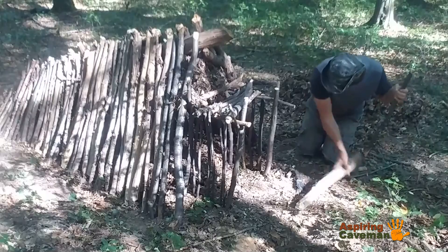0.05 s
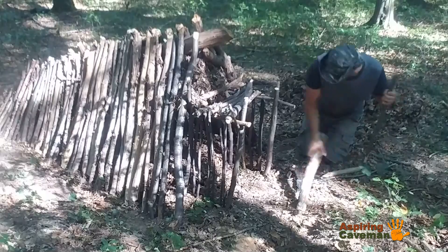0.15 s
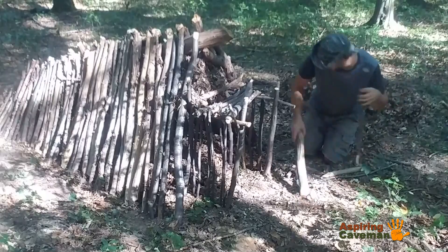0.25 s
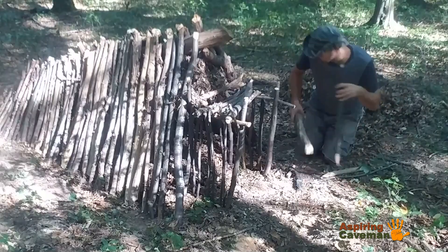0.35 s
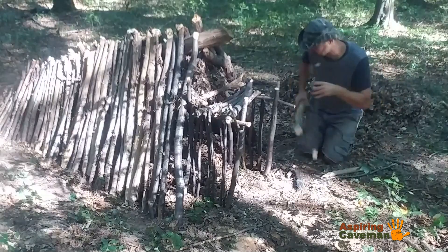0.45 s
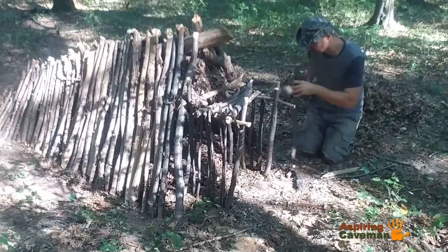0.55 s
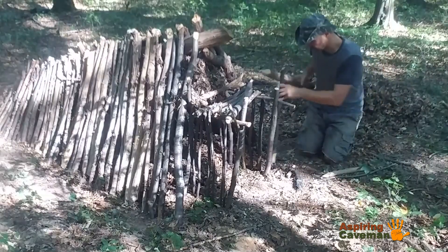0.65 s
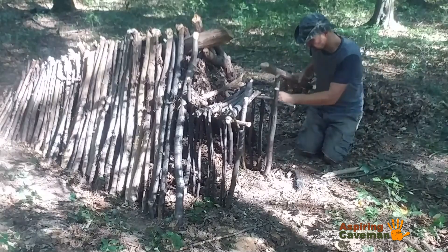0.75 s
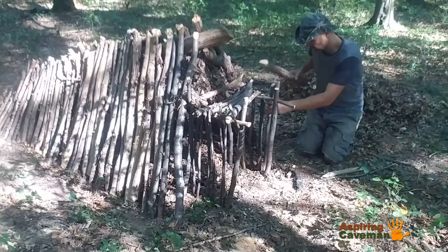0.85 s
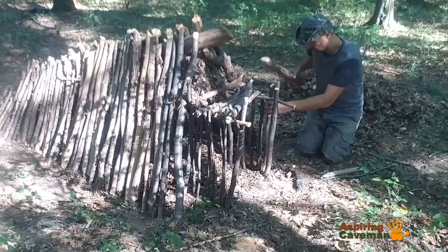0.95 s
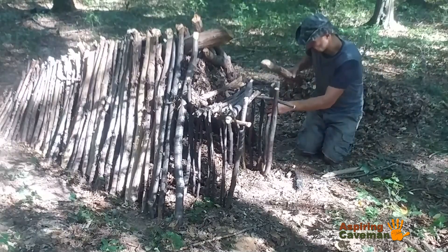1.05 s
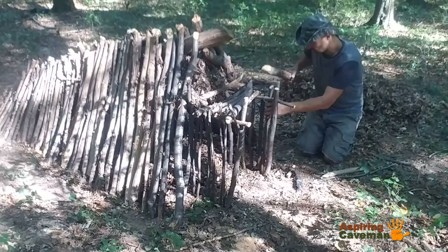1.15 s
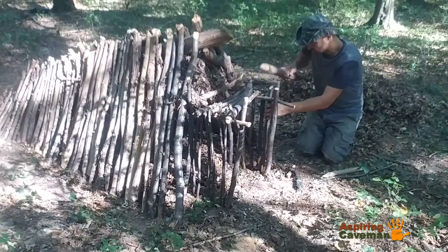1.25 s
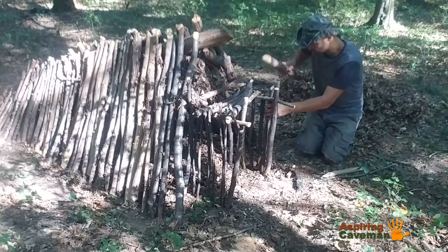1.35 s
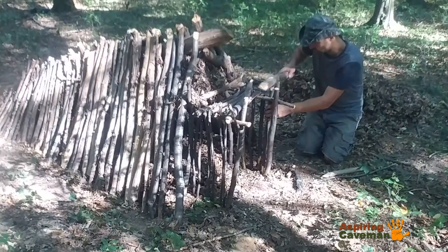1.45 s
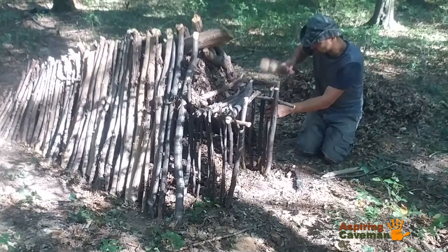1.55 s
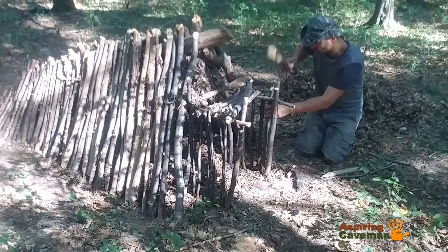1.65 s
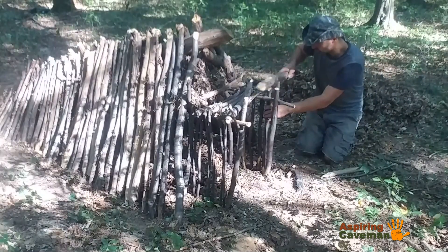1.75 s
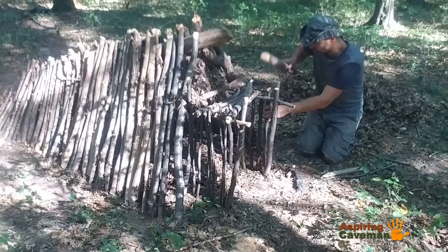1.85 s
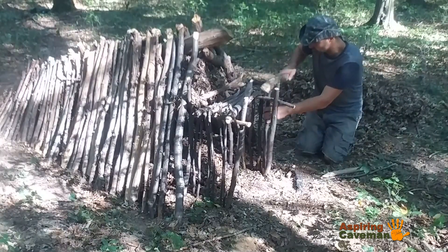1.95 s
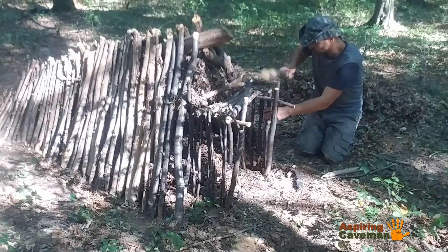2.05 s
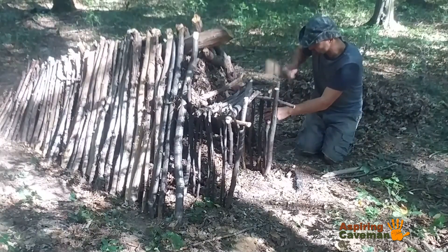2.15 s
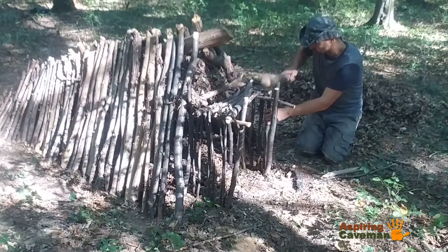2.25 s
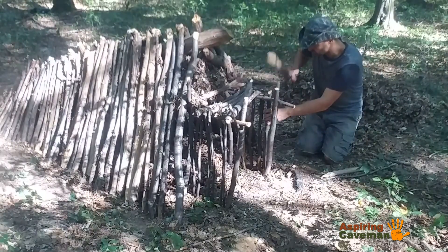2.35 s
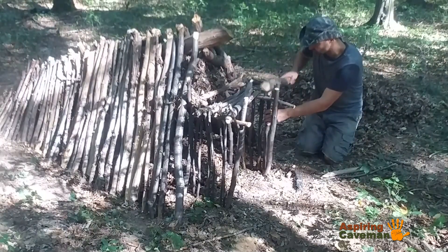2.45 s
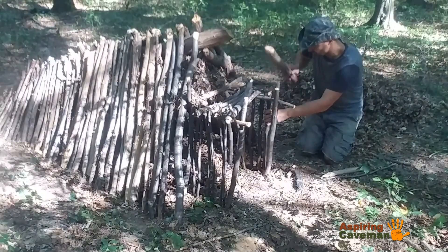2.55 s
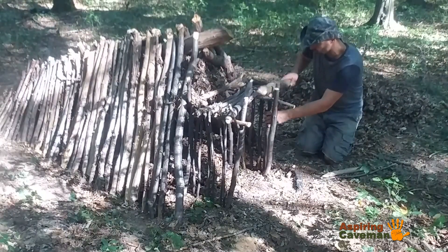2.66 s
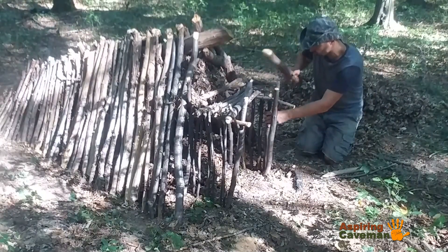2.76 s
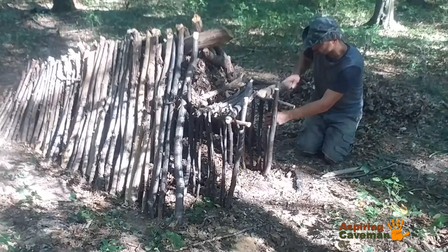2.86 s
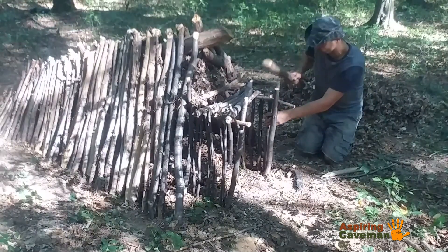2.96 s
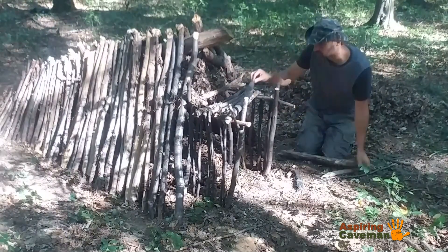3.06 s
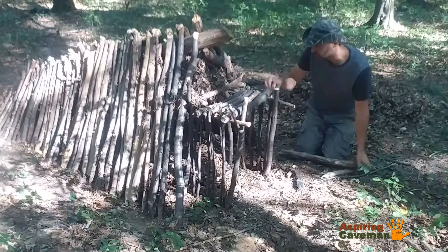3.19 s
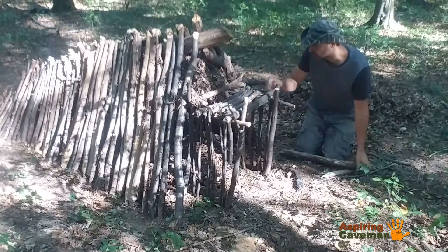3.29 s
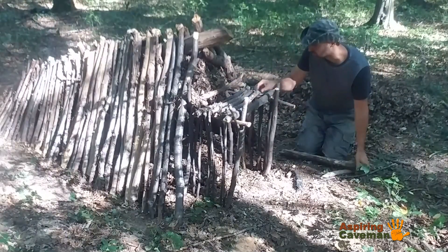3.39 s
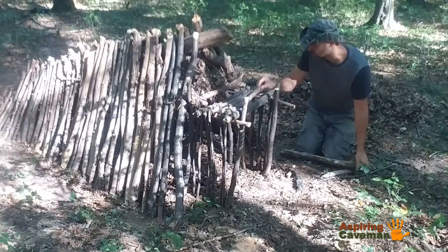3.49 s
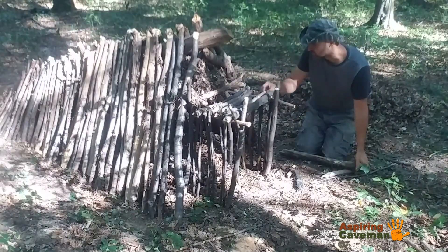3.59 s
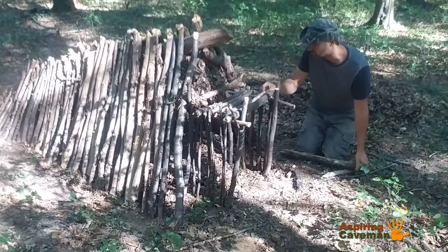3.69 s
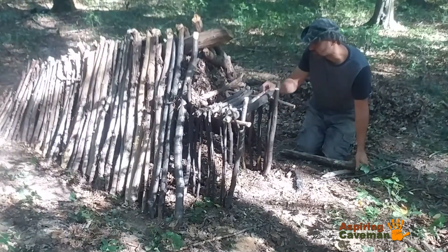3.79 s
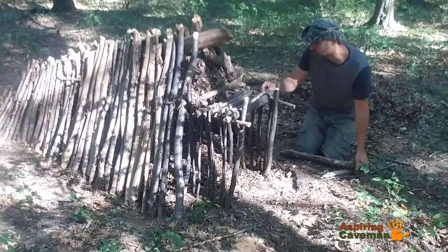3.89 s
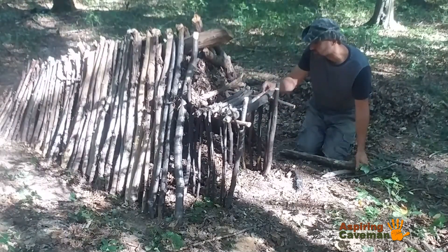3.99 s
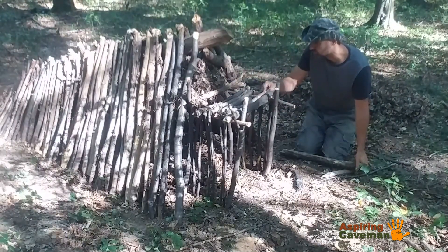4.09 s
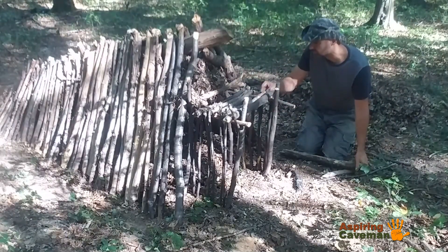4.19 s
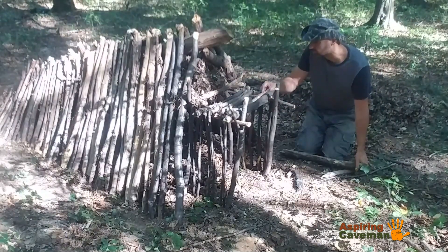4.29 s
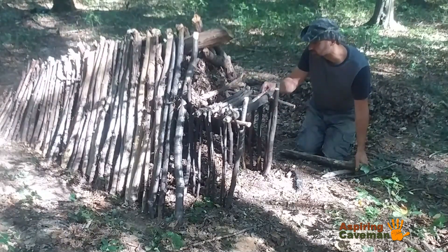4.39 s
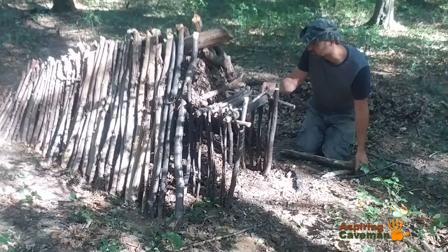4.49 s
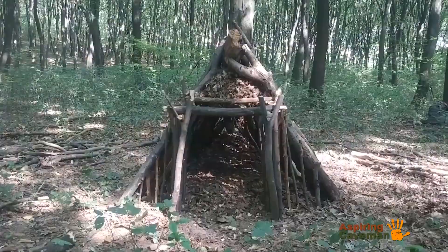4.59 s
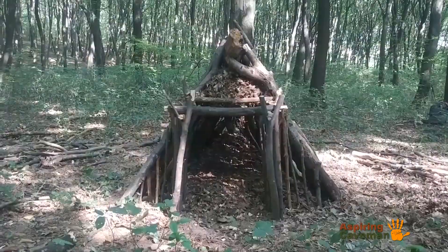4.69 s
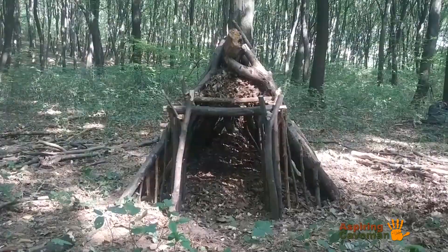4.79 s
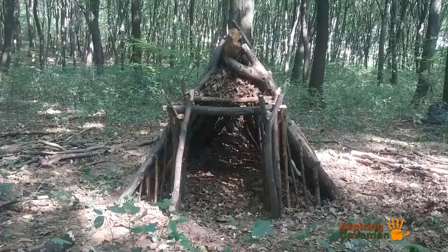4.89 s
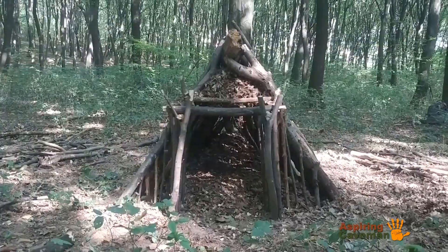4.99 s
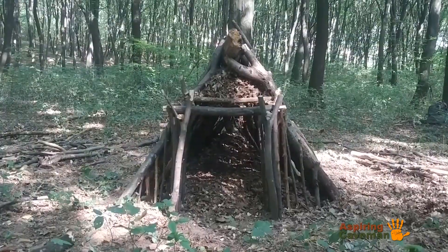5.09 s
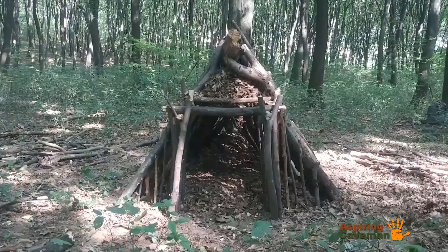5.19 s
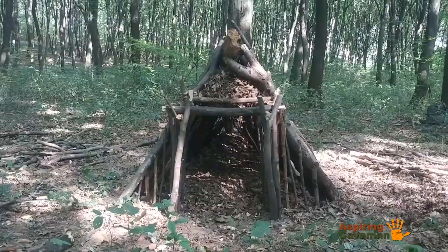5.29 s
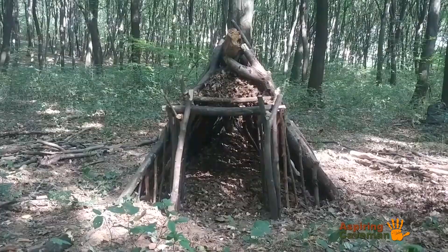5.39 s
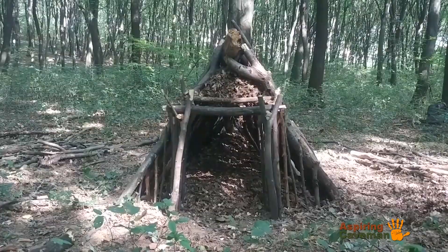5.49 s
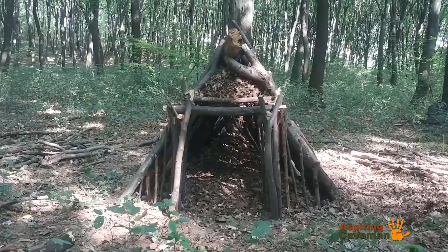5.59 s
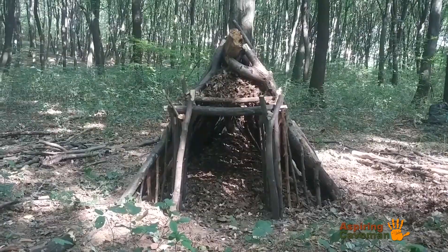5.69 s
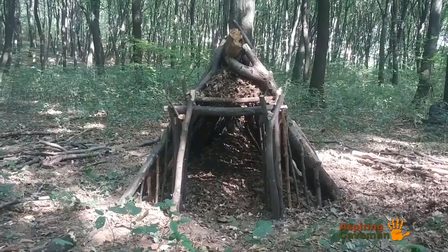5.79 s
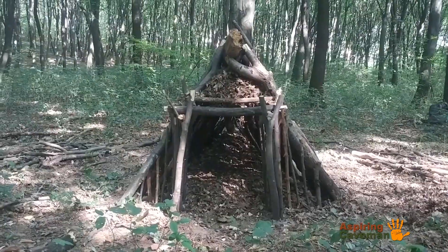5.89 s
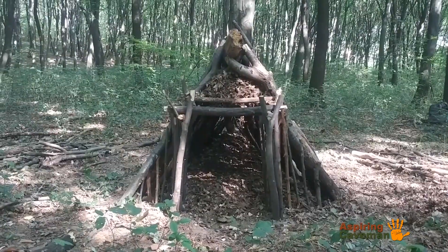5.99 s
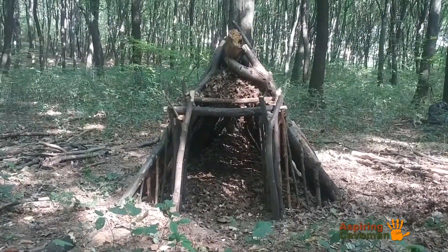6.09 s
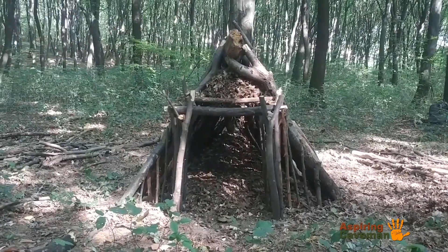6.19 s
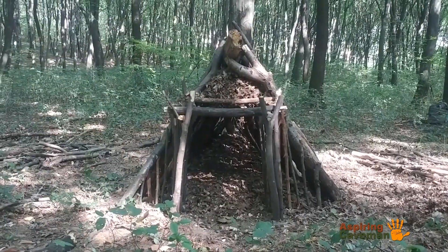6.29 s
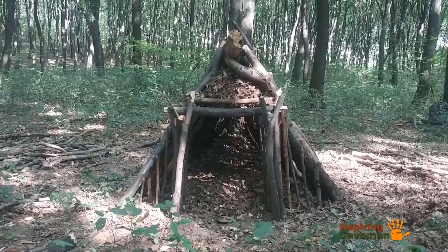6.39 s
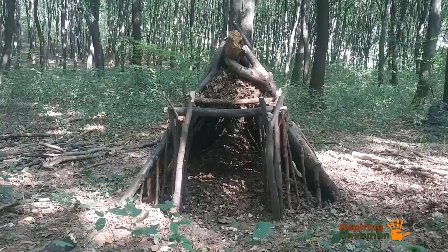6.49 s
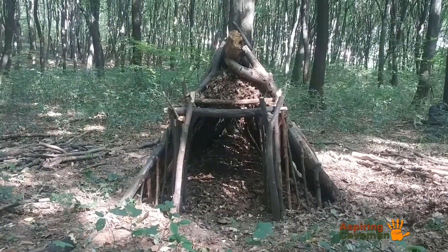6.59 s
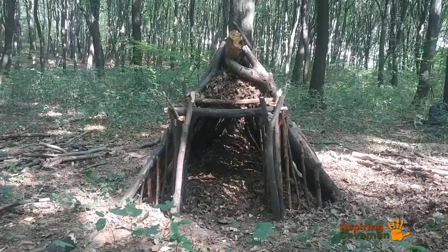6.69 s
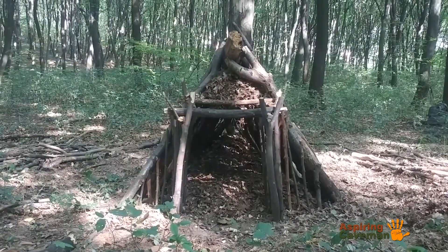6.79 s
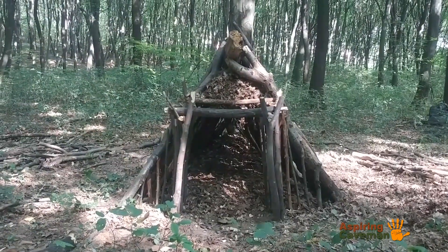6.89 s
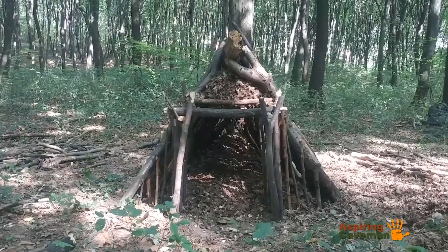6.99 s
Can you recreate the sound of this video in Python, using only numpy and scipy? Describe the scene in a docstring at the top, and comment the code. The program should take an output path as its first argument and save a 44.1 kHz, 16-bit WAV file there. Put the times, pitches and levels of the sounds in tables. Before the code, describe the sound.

A club taps a wooden stake at a steady pace among twittering birds and leafy breeze; the air abruptly stills, low gusts buffet the microphone.

```python
"""A wooden stake is knocked into the frame of a stick shelter with a club, a few metres away in a forest.
Each blow is a chatter of several contacts, made of short decaying sines for wood and noisy cracks for bark.
Finches sing rapid trills, built from gliding whistles with echoes off the trunks. A breeze of filtered noise
rushes in the canopy until the scene changes to a stiller spot; gusts of low noise rumble on the microphone.
Behind them lie the far murmur of the forest and a faint hiss."""
import sys
import numpy as np
from scipy import signal
from scipy.fft import rfft, irfft, next_fast_len
from scipy.io import wavfile

SR = 44100
rng = np.random.default_rng(int(sys.argv[2]) if len(sys.argv) > 2 else 0)


def waveform_to_disk(signal):
    """Save audio, clipped to [-1, 1], as 16-bit WAV at the path in sys.argv[1]."""
    frames = np.transpose(np.atleast_2d(signal))
    scaled = np.clip(frames, -1, 1) * 32767
    samples = np.round(scaled).astype(np.int16)
    wavfile.write(sys.argv[1], SR, samples)


N = 310905
TIME = np.arange(N) / SR
SCENE_CHANGE_S = 4.59


def from_db(db):
    """Turn decibels into a gain."""
    return 10 ** (np.asarray(db) / 20)


def rms_one(x):
    """Scale a sound to an average (rms) strength of 1."""
    return x / np.sqrt(np.mean(x ** 2) + 1e-20)


def in_time(rows):
    """Draw straight lines between (time, value) points and read them at every sample."""
    return np.interp(TIME, *np.transpose(rows))


def at_hz(points, hz):
    """Read a spectrum between its points, with pitch spaced by octaves."""
    where, db = np.transpose(points)
    return np.interp(np.log(hz + 1e-6), np.log(where), db)


def add(track, s, sound):
    """Mix a short sound into a track at time s."""
    start = int(np.clip(round(s * SR), 0, N - 1))
    track[start:start + len(sound)] += sound[:N - start]


def panned(x, right_db):
    """Make the right side louder than the left by so many dB."""
    return x * from_db(np.array([[-.5], [.5]]) * right_db)


def placed(x, right_db, lag_s):
    """A source to the right is louder there and reaches the left side later."""
    late = np.interp(TIME - lag_s, TIME, x)
    return panned(np.array([late, x]), right_db)


def coloured_noise(spectrum):
    """Random noise shaped to a spectrum, unrelated left and right, with rms 1."""
    hz = np.fft.rfftfreq(2 * next_fast_len(N // 2 + 1), 1 / SR)
    gain = from_db(at_hz(spectrum, hz))
    gain[0] = 0  # no constant offset
    real = rng.standard_normal((2, len(gain)))
    imaginary = rng.standard_normal((2, len(gain)))
    return rms_one(irfft(gain * (real + 1j * imaginary))[:, :N])


def among_trunks(x, t60, build_s):
    """Many faint echoes off trunks and leaves, different on each side; t60 is the time to fade by 60 dB."""
    t = TIME[:SR]
    echoes = rng.standard_normal((2, SR)) * from_db(-60 * t / t60) * (1 - np.exp(-t / build_s))
    echoes /= np.linalg.norm(echoes, axis=1, keepdims=True)
    return signal.fftconvolve(np.atleast_2d(x), echoes, axes=1)[:, :N]


def struck(modes, pitch):
    """Struck wood rings as decaying sines; every contact weights them a little differently."""
    t = TIME[:SR // 10]
    sound = np.zeros(len(t))
    for hz, db, t60 in modes:
        fading = from_db(db + rng.standard_normal() - 60 * t / t60)
        sound += fading * np.sin(2 * np.pi * hz * pitch * t)
    return sound


def crushed(sound, crush_s):
    """Bark fibres give way in a brief burst of tiny impacts that drives all modes about evenly."""
    fade = np.exp(-TIME[:SR // 50] / crush_s)
    spectrum = rfft(rng.standard_normal(len(fade)) * fade)
    even = irfft(spectrum / np.abs(spectrum), len(fade))  # every pitch equally strong
    burst = even * np.sqrt(fade)
    return signal.fftconvolve(sound, burst / np.linalg.norm(burst))


def dulled(x, top_hz):
    """Wood carries little above a certain pitch, so a low-pass filter takes the top away."""
    return signal.sosfilt(signal.butter(6, top_hz, fs=SR, output="sos"), x)


# Ways the stake vibrates, from its sway in the soil to the snap of its bark.
# Columns: pitch_hz (ring and crack: before the blow's pitch ratio), relative level_db, fade_by_60_db_s
THUD_MODES = [(177, 0.5, 0.062), (284, -1.5, 0.029), (332, 4, 0.042)]
RING_MODES = [(673, -6, 0.032), (790, -3.5, 0.019), (1000, -13, 0.006), (1330, -24, 0.027)]
CRACK_MODES = [(1610, -8.5, 0.014), (2125, -15, 0.011), (2310, -17, 0.0074), (2830, 0, 0.0077),
               (3030, -10, 0.0058), (3390, -6, 0.0088), (4080, 0, 0.0023)]
SNAP_MODES = [(6020, 2, 0.0063), (6580, -2, 0.0054), (7000, 0, 0.005), (7500, -13.5, .006)]
# The club's two rebounds after each landing.
# Columns: delay (in rebound lags of the blow), wood_db, bark_db (both relative to the landing)
REBOUNDS = [(1, -10.5, -2), (1.8, -11, -10.5)]
# Blows on the stake; the levels are relative within each column.
# Columns: landing_s, thud_db, ring_db, crack_db, snap_db, pitch_ratio (of ring and crack),
# graze_lead_s, graze_db (relative to the landing), rebound_lag_s
BLOWS = [ (1.5964, -69, -60.5, -44.5, -34, 1.1, 0.0011, -21, .0016),
         (1.8493, -39, -27.5, -33, -33.5, .87, .005, -4.5, 0.0013),
         (2.1020, -51, -25, -51, -31, 0.94, 0.00222, -7, 0.0029),
         (2.3279, -33.5, -28, -28.5, -38, 0.936, 0.0046, -5, 0.0023),
         (2.539, -33.5, -26.5, -25.5, -37.5, .96, 0.00448, -4, 0.0024),
         (2.7502, -38.5, -19, -21, -27.5, 1.024, 0.0027, -14, 0.0029),
         (2.9680, -41, -29, -28, -35, 0.98, 0.0014, -25, .0021),
         (7.0354, -60, -49, -35.5, -41, 1.22, 0.0015, -21, 0.00082)]
CONTACT_JITTER_S, KNOCK_LAG_S = 0.00024, .00009


def knocks():
    """The club grazes, lands and rebounds; landing sways the stake, each contact rings it and cracks bark."""
    body, crack, snap = np.zeros((3, N))
    for landing_s, thud_db, ring_db, crack_db, snap_db, pitch, lead_s, graze_db, rebound_s in BLOWS:
        add(body, landing_s, from_db(thud_db) * struck(THUD_MODES, 1.0))
        # each contact: seconds after the landing, wood dB, bark dB
        contacts = [(-lead_s, graze_db, graze_db), (0, 0, 0)]
        for lags, wood_db, bark_db in REBOUNDS:
            after_s = lags * rebound_s + CONTACT_JITTER_S * rng.standard_normal()
            contacts.append((after_s, wood_db, bark_db))
        for after_s, wood_db, bark_db in contacts:
            s = landing_s + after_s
            cracking = crushed(struck(CRACK_MODES, pitch), crush_s=0.00078)
            snapping = crushed(struck(SNAP_MODES, 1), crush_s=0.00076)
            add(body, s, from_db(ring_db + wood_db) * struck(RING_MODES, pitch))
            add(crack, s, from_db(crack_db + bark_db) * cracking)
            add(snap, s, from_db(snap_db + bark_db) * snapping)
    body = placed(dulled(body, top_hz=2450), right_db=0.0, lag_s=KNOCK_LAG_S)
    crack = from_db(-6) * placed(dulled(crack, top_hz=4100), right_db=2.5, lag_s=KNOCK_LAG_S)
    snap = from_db(-9.5) * placed(dulled(snap, top_hz=8700), right_db=14.5, lag_s=KNOCK_LAG_S)
    direct = body + crack + snap
    near = from_db(-8.5) * among_trunks(direct, t60=0.078, build_s=0.00094)
    far = from_db(-25) * among_trunks(direct, t60=0.46, build_s=.015)
    return direct + near + far


NOTE_DETUNE, NOTE_SPREAD_DB = .07, 2.2
TREMBLE_SHARE, TREMBLE_MOST, TREMBLE_PER_S = .17, .052, 900


def whistle(length_s, start_hz, end_hz, db):
    """One gliding note; the wider it sweeps, the more its pitch strays and trembles."""
    t = TIME[:int(length_s * SR)]
    detune, force, *tremble = rng.standard_normal(128)
    sweep = abs(np.log(end_hz / start_hz))
    depth = min(TREMBLE_SHARE * sweep, TREMBLE_MOST)
    quiver = depth * np.interp(t * TREMBLE_PER_S, np.arange(len(tremble)), tremble)
    glide_hz = start_hz * (end_hz / start_hz) ** (t / length_s)
    hz = glide_hz * (1 + NOTE_DETUNE * sweep * detune + quiver)
    swell = np.sin(np.pi * t / length_s) ** .4
    tone = np.sin(2 * np.pi * np.cumsum(hz) / SR)
    return from_db(db + NOTE_SPREAD_DB * force) * rms_one(swell * tone)


# The finch's songs. Columns: main_trill_start_s, opening_trill_length_s, rattle_length_s, relative level_db
SONGS = [(.719, .3, .37, -52), (4.024, 0.097, .31, -50.5), (5.288, .09, .31, -51.5)]
# One note of each trill, before its random variation. Columns: length_s, start_hz, end_hz, relative level_db
OPENING_NOTE = (.017, 5444, 4792, -1.5)
MAIN_NOTE = (0.0177, 4500, 3720, 0.91)
# One syllable of the rattle, and the closing flourish; every note varies a little at random.
# Columns: time_into_it_s, length_s, start_hz, end_hz, relative level_db
RATTLE = [(0, 0.025, 4446, 2740, 0.5), (.03, 0.017, 3386, 5610, 0)]
FLOURISH = [(.025, 0.03, 4540, 2630, 0), (.10, 0.0178, 3674, 4420, 0), (.125, .04, 5400, 4120, 0),
            (.16, .07, 3405, 2250, -6)]
TRILL_NOTES_PER_S, MAIN_TRILL_S, TRILL_SWELL_DB = 38, .29, 4
RATTLE_PERIOD_S, NOTE_JITTER_S = .0615, .003


def finch():
    """Every song steps down through two swelling trills into a rattle, with a flourish to close it."""
    out = np.zeros(N)
    for s, opening_s, rattle_s, db in SONGS:
        song = np.zeros(N)
        trills = [(s - opening_s, opening_s, OPENING_NOTE), (s, MAIN_TRILL_S, MAIN_NOTE)]
        for start, length, note in trills:
            for share in np.linspace(0, 1, round(length * TRILL_NOTES_PER_S), endpoint=False):
                swell = from_db(TRILL_SWELL_DB * (share - 1))
                add(song, start + share * length, swell * whistle(*note))
        syllables = [RATTLE] * round(rattle_s / RATTLE_PERIOD_S) + [FLOURISH]
        for k, syllable in enumerate(syllables):
            syllable_s = s + MAIN_TRILL_S + k * RATTLE_PERIOD_S
            for after_s, *note in syllable:
                jitter_s = NOTE_JITTER_S * rng.standard_normal()
                add(song, syllable_s + after_s + jitter_s, whistle(*note))
        # a song begun at the first spot breaks off when the scene changes
        same_spot = (TIME < SCENE_CHANGE_S) == (s < SCENE_CHANGE_S)
        out += from_db(db) * song * same_spot
    return out


# Calls of other birds, from low fluting to thin peeps.
# Columns: start_s, length_s, middle pitch_hz, glide_ratio (end over start of each note), relative level_db
CHIRPS = [ (0.162, 0.022, 6450, 0.61, -51.5), (.195, 0.08, 3660, 1.14, -58), (.535, 0.062, 2196, .85, -54),
          (.703, 0.099, 2560, 1.09, -49), (.827, 0.068, 2800, 1.1, -57.5),
          (0.955, 0.064, 3620, 1.18, -50.5), (0.971, 0.039, 4800, 0.65, -49.5),
          (1.869, 0.045, 3560, 1.16, -59), (2.128, 0.027, 4150, 1.04, -54), (2.23, 0.036, 4170, 1.04, -59),
          (2.904, 0.069, 3550, 1.16, -55), (3.096, 0.028, 4190, 1.15, -56), (3.197, 0.043, 4220, 0.94, -60),
          (3.382, 0.02, 5170, .96, -54.5), (3.678, 0.059, 5080, 1.17, -55), (3.688, 0.054, 3540, 1.2, -53),
          (3.842, .03, 5175, .96, -52), (4.167, 0.052, 5000, 1.16, -55), (4.405, 0.12, 3680, 1, -56),
          (4.635, 0.042, 5080, 1.17, -57), (4.953, 0.054, 5100, 1.14, -52.5),
          (4.959, 0.064, 3576, 1.2, -56), (5.147, 0.062, 5170, .98, -59),
          (5.449, 0.0357, 4950, 1.08, -47.5), (5.67, 0.062, 3540, 0.78, -53),
          (5.868, 0.028, 6200, 0.75, -53), (5.885, 0.084, 4190, 0.99, -55.5),
          (6.009, .07, 1840, 0.85, -57.5), (6.144, 0.037, 2400, 0.84, -51), (6.329, 0.043, 1994, 1.16, -57),
          (6.394, .09, 2180, 0.76, -58), (6.571, 0.022, 1780, 1.06, -53.5), (6.62, 0.06, 2530, 0.89, -55),
          (6.81, 0.0238, 4650, 0.8, -57), (6.922, 0.049, 3610, 1.2, -63)]
CHIRP_NOTES_PER_S = 40


def other_birds():
    """Each call is one gliding note or a quick run of like notes."""
    out = np.zeros(N)
    for s, length, hz, glide, db in CHIRPS:
        notes = max(1, round(length * CHIRP_NOTES_PER_S))
        note_s = length / notes
        for k in range(notes):
            add(out, s + k * note_s, whistle(note_s, hz / np.sqrt(glide), hz * np.sqrt(glide), db))
    return out


BIRD_DB, BIRD_DIRECT_DB, BIRD_ECHO_DB = -3, -8.3, -7.3
BIRD_LAG_S, BIRD_T60_S, BIRD_BUILD_S = 0.000488, .33, .002


def birds():
    """Runs of short gliding whistles from the right, heard largely through their echoes."""
    song = finch() + other_birds()
    first = TIME < SCENE_CHANGE_S
    # echoes of the first spot end with it
    first_echoes = first * among_trunks(song * first, BIRD_T60_S, BIRD_BUILD_S)
    second_echoes = among_trunks(song * ~first, BIRD_T60_S, BIRD_BUILD_S)
    direct = from_db(BIRD_DIRECT_DB) * placed(song, 0, BIRD_LAG_S)
    heard = direct + from_db(BIRD_ECHO_DB) * (first_echoes + second_echoes)
    return from_db(BIRD_DB) * panned(heard, right_db=9.0)


# The breeze's rise and fall. Columns: time_s, level_db (before BREEZE_DB is added)
BREEZE = [(0.0, -53), (0.2, -52.5), (0.47, -53.5), (0.68, -53.5), (1.09, -51.5), (1.46, -53.5),
          (2.57, -54.5), (2.94, -53.5), (3.2, -52), (3.66, -53.5), (4.36, -53), (4.44, -52.5)]
# The breeze's spectrum. Columns: ratio to the centre pitch, relative level_db per Hz
BREEZE_SHAPE = [(.2, 4), (.45, -4), (.75, 1), (1.1, 2.5), (1.5, -5.5), (2.2, -20.5), (3.5, -32), (6, -34)]
# the rush has this centre at its mean level and brightens as it swells
BREEZE_CENTRE_HZ, BREEZE_OCTAVES_PER_DB, BREEZE_DB = 948, 0.1934, 5.5


def breeze():
    """Wind in the canopy: a broad rush whose centre rises with the flow; it ends when the scene changes."""
    level_db = in_time(BREEZE)
    mean_db = level_db[TIME < SCENE_CHANGE_S].mean()
    centre = BREEZE_CENTRE_HZ * 2 ** (BREEZE_OCTAVES_PER_DB * (level_db - mean_db))
    edges = np.geomspace(180, 5800, 16)  # 15 bands of noise, in Hz
    white = rng.standard_normal((2, 2, N))
    out = 0
    for k, (low, high) in enumerate(zip(edges, edges[1:])):
        band_filter = signal.butter(2, [low, high], "band", fs=SR, output="sos")
        band = signal.sosfilt(band_filter, white[k % 2])  # neighbouring bands use different noise
        out = out + band * from_db(at_hz(BREEZE_SHAPE, np.sqrt(low * high) / centre))
    present = np.clip((SCENE_CHANGE_S - TIME) / 0.0086, 0, 1)
    return rms_one(out) * from_db(level_db + BREEZE_DB) * present


# Gusts on the microphone. Columns: peak_s, width_s, level_db (before GUST_DB is added)
GUSTS = [(1.84, 0.21, -36), (2.42, 0.053, -36), (3.02, 0.14, -34.5), (3.40, .05, -28.5),
         (3.58, 0.26, -33.5), (4.37, 0.29, -33), (4.851, 0.11, -29), (5.12, 0.11, -27), (5.281, 0.1, -20.5),
         (5.46, 0.11, -20), (5.76, 0.38, -27), (6.28, 0.061, -34), (7.04, 0.054, -36)]
# The rumble's spectrum. Columns: pitch_hz, relative level_db per Hz
GUST_SPECTRUM = [(3, -33), (8, -5.5), (18, 3), (35, -7), (60, -15), (110, -22), (200, -44.5), (400, -48.5),
                 (1000, -63), (4000, -100)]
LULL_DB, GUST_DB = -49, 4  # the lull too is raised by GUST_DB
GUST_RISE_SHARE = 0.87  # width of the rise compared with the fall


def gusts():
    """Turbulence buffets each side separately; a gust swells out of the lull and dies a little more slowly."""
    power = from_db(LULL_DB) ** 2
    for s, width_s, db in GUSTS:
        away = (TIME - s) / (width_s * np.where(TIME < s, GUST_RISE_SHARE, 1))
        hump = from_db(db) / np.cosh(np.clip(2 * away, -20, 20))
        power = power + hump ** 2
    return from_db(GUST_DB) * np.sqrt(power) * coloured_noise(GUST_SPECTRUM)


# Spectra of the murmur at the first and the second, stiller spot. Columns: pitch_hz, relative level_db per Hz
FOREST_SPECTRUM = [(12, -7.5), (30, -0.5), (70, -5), (130, -11), (280, -14.5), (480, -24), (900, -44),
                   (1500, -36), (3000, -42.5), (15000, -50.5)]
STILL_SPECTRUM = [(12, -7.5), (30, 2.5), (70, -5.5), (130, -10), (280, -12), (480, -25), (650, -28.5),
                  (900, -31.5), (1500, -38), (3000, -44), (15000, -49.5)]
# How loud the murmur is at the second spot. Columns: time_s, level_db
STILL_LEVEL = [(4.6, -45), (5.1, -45.5), (5.5, -42.5), (6.0, -41.5), (7.05, -41.5)]
FOREST_DB = -43.5


def murmur():
    """The far noise of the forest: steady at the first spot, gently varying in level at the second."""
    first = from_db(FOREST_DB) * coloured_noise(FOREST_SPECTRUM)
    second = from_db(in_time(STILL_LEVEL)) * coloured_noise(STILL_SPECTRUM)
    # a 10 ms crossfade between the spots
    turn = np.pi / 2 * np.clip((TIME - SCENE_CHANGE_S) * 100, 0, 1)
    return panned(first * np.cos(turn) + second * np.sin(turn), right_db=2.0)


# Spectrum of the microphones' hiss. Columns: pitch_hz, relative level_db per Hz
HISS_SPECTRUM = [(500, 1), (4000, 1), (9000, -1.3), (15000, -1.9)]
HISS_DB = -62.5


def hiss():
    """The microphones' own faint, steady noise."""
    return from_db(HISS_DB) * coloured_noise(HISS_SPECTRUM)


def scene():
    """Knocks and birds over the moving air, the murmur of the forest and the microphones' hiss."""
    return knocks() + birds() + breeze() + gusts() + murmur() + hiss()


CUTOFF_HZ = 15800


def record(dry):
    """A steep low-pass filter cuts the very top."""
    return signal.sosfilt(signal.ellip(12, .1, 90, CUTOFF_HZ, fs=SR, output="sos"), dry)


dry = scene()
out = record(dry)
waveform_to_disk(out)
```